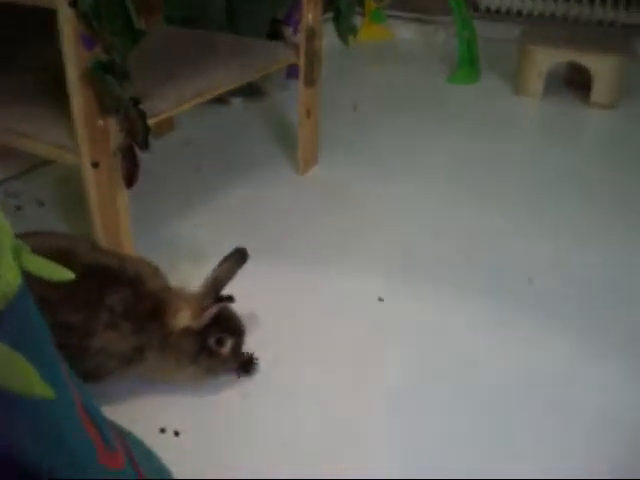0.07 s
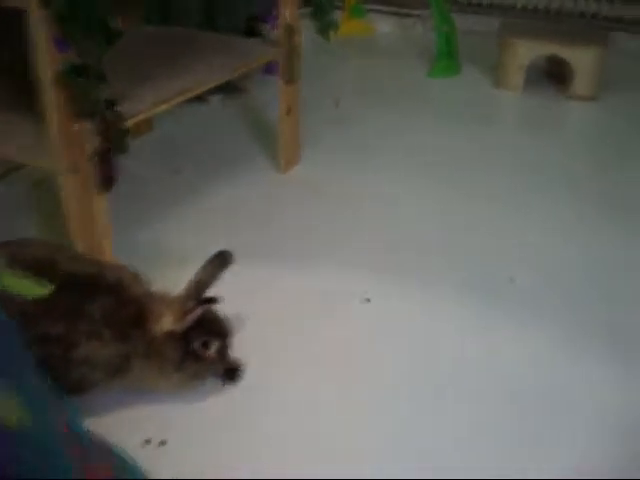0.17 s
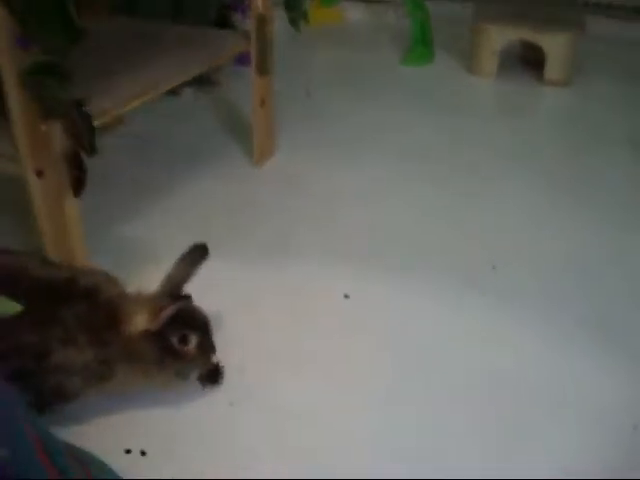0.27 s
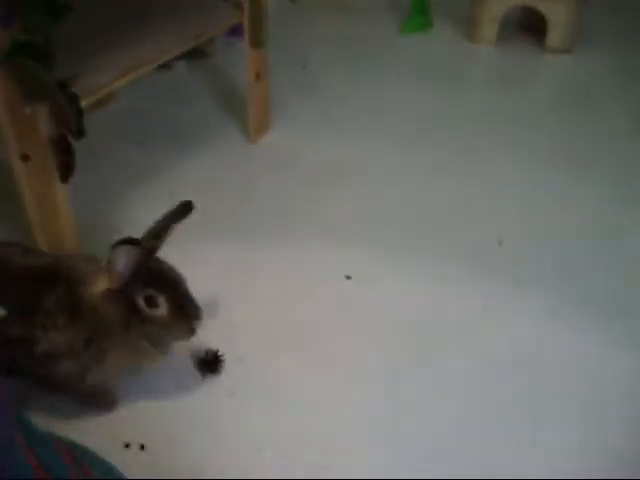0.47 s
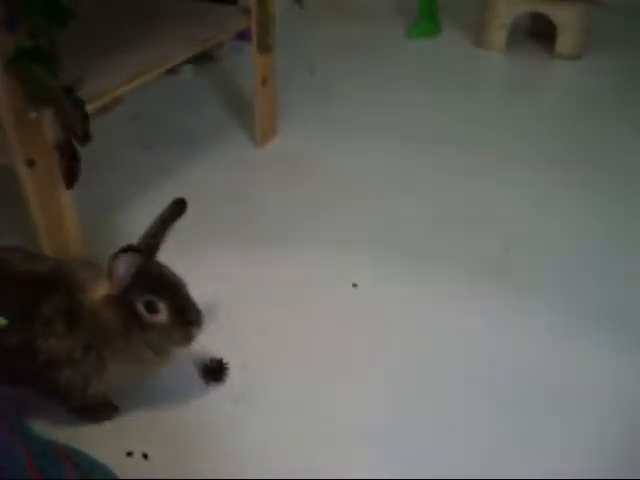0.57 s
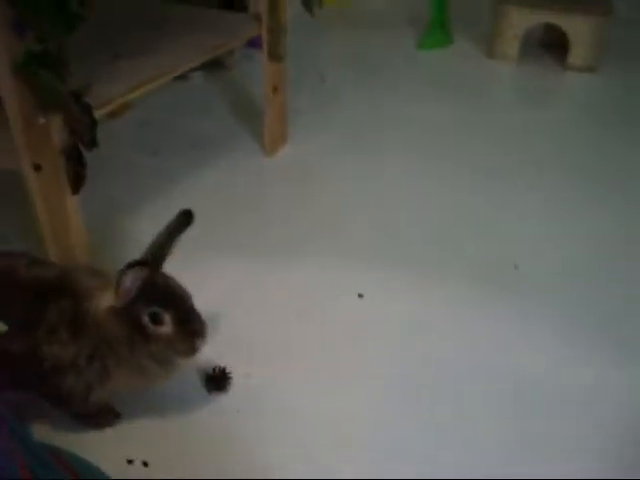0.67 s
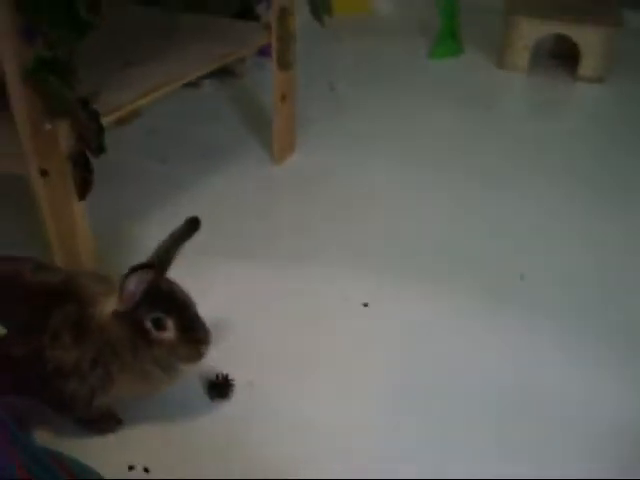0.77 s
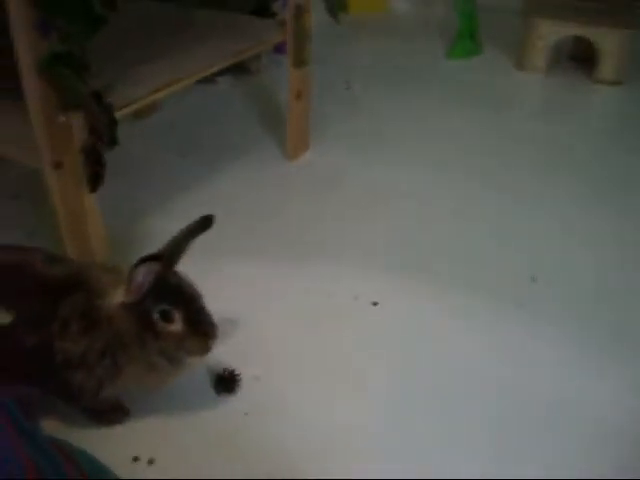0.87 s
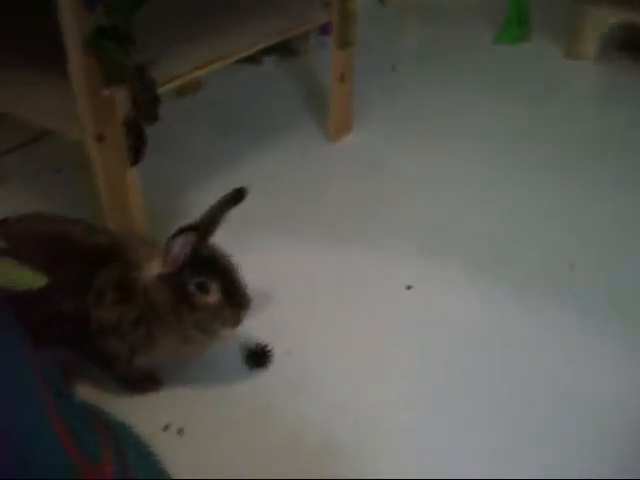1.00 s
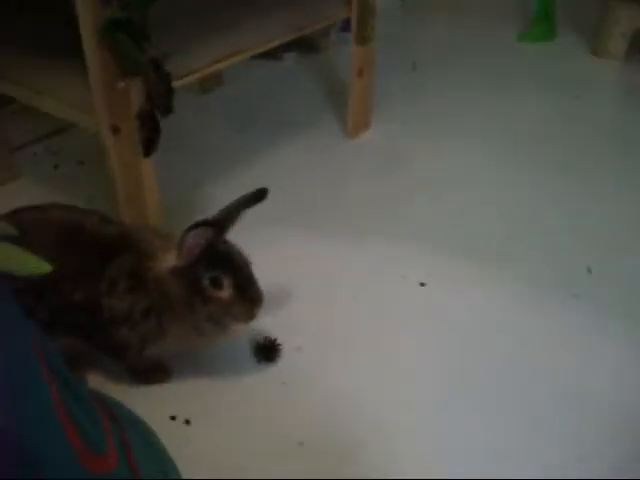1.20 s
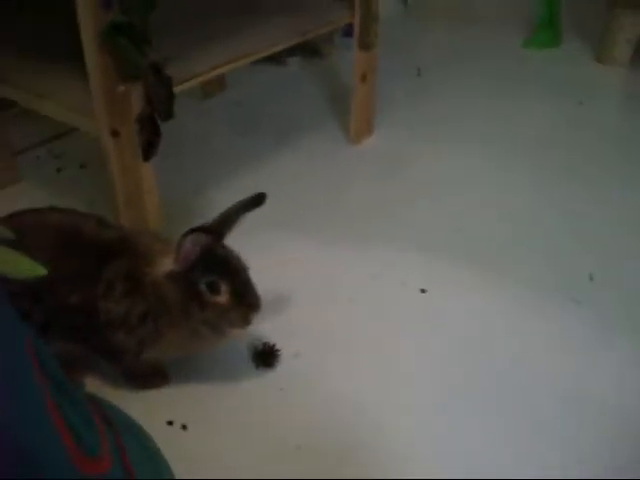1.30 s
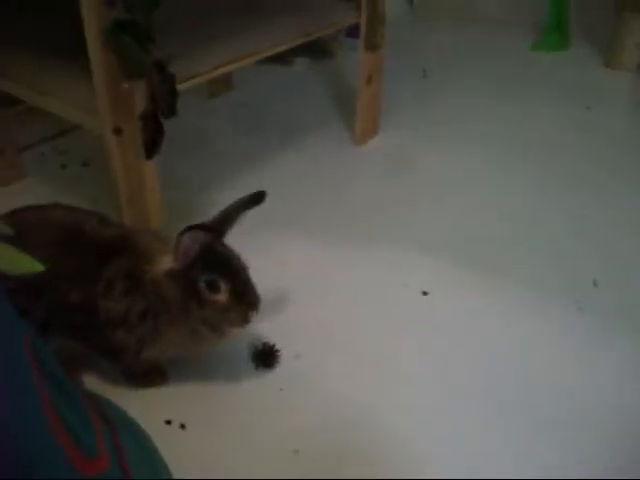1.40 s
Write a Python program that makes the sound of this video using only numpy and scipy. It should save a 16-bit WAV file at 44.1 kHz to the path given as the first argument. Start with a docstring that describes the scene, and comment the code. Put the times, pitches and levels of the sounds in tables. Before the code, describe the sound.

A single low thump sounds as a rabbit stamps on the floor, and the quiet room rings briefly. Faint paw shuffling and a couple of light taps come after, with low hum and grainy microphone hiss throughout.

```python
"""Rabbit stamp in a quiet room

A rabbit stamps a hind foot once in a small room: the boards heave, then floor and room boom and swell.
Light taps and soft scuffles surround the stamp, over a low hum.
A small camera's coarse 8-bit converter adds a gritty hiss and a thin whistle on the thump."""
import sys
import numpy as np
from scipy import signal
from scipy.fft import irfft
from scipy.io import wavfile

SR = 44100
rng = np.random.default_rng(int(sys.argv[2]) if len(sys.argv) > 2 else 0)


def log_audio(samples):
    """Write samples as a 16-bit WAV file to the path given in sys.argv[1]."""
    # one column per channel
    frames = np.atleast_2d(samples).T
    # limit to full scale, then quantise
    limited = np.clip(frames, -1, 1)
    pcm = np.round(limited * 32767).astype(np.int16)
    wavfile.write(sys.argv[1], SR, pcm)


N = 63945

# slap of the sole (frequency [Hz], relative density [dB])
SLAP_SPECTRUM = [(150, -7.5), (430, -4.5), (780, -4), (1030, 1.5), (1280, -12.5), (2400, -11), (4500, -22)]
# short clack of the boards under the foot (frequency [Hz], level [dB], t60 [s])
CLACK_MODES = [(421.3, -17.5, .04), (643, -25.5, .035), (1036, -29, .04)]
# ring of floor and room (frequency [Hz], relative level [dB], t60 [s])
FLOOR_ROOM_MODES = [(50.97, -22.5, 1.0), (78, -31, 1.0), (118, -23.5, .5), (135.6, -20, .66),
                    (155.1, -26.5, .7), (180.5, -29, 0.76), (189.2, -24, 0.82), (231.6, -27, .63),
                    (266.1, -33.5, .9), (287.9, -28.5, .55), (337.3, -27, .65), (360.5, -37.5, .65),
                    (420.8, -43.5, .6), (612.3, -44.5, 0.54)]
# low, diffuse room boom (frequency [Hz], relative density [dB])
BOOM_SPECTRUM = [(25, -8), (45, -4), (95, -8), (140, 1), (230, -3), (380, -4), (500, -15), (750, -25),
                 (1250, -37.5)]
# the room's echo of the clack (frequency [Hz], relative density [dB])
ECHO_SPECTRUM = [(350, -8), (450, 1), (620, -3), (760, -6.5), (1000, -4), (1200, -18), (3000, -31.5)]
# light taps, and at 0.35 s a dull low knock just after the stamp (time [s], body level [dB], tick level [dB],
# t60 [s])
TAP_AND_KNOCK_CUES = [(.083, -55.5, -40, 0.048), (0.35, -28, -68, 0.17), (1.014, -45, -46.5, 0.057),
                      (1.329, -34, -55, .1)]
# dull body of a tap or the knock (frequency [Hz], relative density [dB])
BODY_SPECTRUM = [(50, -19.5), (140, 1.5), (200, -2.5), (330, -13), (700, -23.5), (1500, -41.5)]
# bright edge of a tap (frequency [Hz], relative density [dB])
TICK_SPECTRUM = [(300, -11), (650, -4), (920, -6.5), (1300, -3), (2000, -5.5), (4000, -19)]
# brief ring of a tap (frequency [Hz], relative level [dB], t60 [s])
TICK_MODES = [(878, 0.5, 0.078), (1033, -1, 0.057), (1363, -8, .04)]
# paw scuffles (start [s], length [s], rumble level [dB], rub level [dB], scratch level [dB])
SCUFFLE_CUES = [(.185, .04, -61.5, -53.5, -50.5), (0.361, .03, -53.5, -57.5, -49.5),
                (0.552, 0.048, -45, -59.5, -67), (0.606, .16, -44.5, -48, -56.5),
                (1.248, .21, -51.5, -62.5, -62)]
# low end of a scuffle (frequency [Hz], relative density [dB])
RUMBLE_SPECTRUM = [(40, -10.5), (90, -8.5), (130, 3), (230, -5), (320, 2.5), (450, -13), (700, -26)]
# midrange of a scuffle (frequency [Hz], relative density [dB])
RUB_SPECTRUM = [(350, -10.5), (600, -7.5), (830, 1), (1020, -5.5), (1300, -14.5), (2500, -25)]
# top end of a scuffle (frequency [Hz], relative density [dB])
SCRATCH_SPECTRUM = [(900, -15), (1900, 0.5), (2900, -2), (4500, -10)]
# fader curve that the hum wavers around (time [s], level [dB])
HUM_FADER = [(0, -57.5), (0.139, -46), (0.648, -45.5), (.92, -49.5), (1.221, -56.5), (1.45, -52.5)]
# dull bed of room noise (frequency [Hz], relative density [dB])
ROOM_SPECTRUM = [(15, 1), (35, -7), (90, -5), (135, 4), (250, -9), (360, -6), (500, -11), (900, -14),
                 (1500, -22), (5000, -35)]
# smooth hiss under the converter's grit (frequency [Hz], relative density [dB])
SMOOTH_HISS_SPECTRUM = [(300, 2), (2000, 0.5), (5000, -8), (9000, -9.5), (11000, -18.5), (12500, -12)]

FAST_RISE_S = .0018


def stamp(at=.227):
    """The sole slaps, the boards clack and heave once, their modes ring on and the room echoes."""
    heave_hz, heave_peak_s, heave_width_s = 149.2, .0064, .0046
    room_rise_s = .0089
    age = since(at)
    from_peak = age - heave_peak_s
    heave_envelope = np.exp(-(from_peak / heave_width_s) ** 2) * np.minimum(age / FAST_RISE_S, 1)
    heave = -undb(-4.5) * np.cos(2 * np.pi * heave_hz * from_peak) * heave_envelope
    slap = undb(-34) * noise(SLAP_SPECTRUM) * hit_envelope(at, FAST_RISE_S, t60=.055)
    clack = struck_modes(CLACK_MODES, at, FAST_RISE_S)
    ring = undb(.5) * struck_modes(FLOOR_ROOM_MODES, at, rise=.012)
    boom = undb(-26.5) * noise(BOOM_SPECTRUM) * hit_envelope(at, room_rise_s, t60=.74)
    echo = undb(-33.5) * noise(ECHO_SPECTRUM) * hit_envelope(at, room_rise_s, t60=.5)
    return heave + slap + clack + ring + boom + echo


def taps_and_knock():
    """Light taps layer a dull body with a ringing tick; the dull knock is nearly all body."""
    out = np.zeros(N)
    for at, body_db, tick_db, t60 in TAP_AND_KNOCK_CUES:
        envelope = hit_envelope(at, FAST_RISE_S, t60)
        tick = noise(TICK_SPECTRUM) * envelope + struck_modes(TICK_MODES, at, FAST_RISE_S)
        body = noise(BODY_SPECTRUM) * envelope
        out += undb(body_db) * body + undb(tick_db) * tick
    return out


def scuffles(attack_s=.025, release_s=.025):
    """Paws shift and slide: a low rumble, a midrange rub and a fine scratch on top."""
    out = np.zeros(N)
    for at, length, rumble_db, rub_db, scratch_db in SCUFFLE_CUES:
        envelope = np.minimum(since(at) / attack_s, 1) * np.exp(-since(at + length) / release_s)
        rumble = undb(rumble_db) * noise(RUMBLE_SPECTRUM)
        rub = undb(rub_db) * noise(RUB_SPECTRUM)
        scratch = undb(scratch_db) * noise(SCRATCH_SPECTRUM)
        out += envelope * (rumble + rub + scratch)
    return out


def hum(pitch_hz=60.15, waver_db=2.5, waver_hz=7):
    """A low sine hum whose level drifts and wavers."""
    waver = noise([(1, 0), (waver_hz, 0)])
    level_db = np.interp(since(0), *np.array(HUM_FADER).T) + waver_db * waver
    return np.sqrt(2) * np.sin(2 * np.pi * pitch_hz * since(0)) * undb(level_db)


def room_tone(room_db=-52, hiss_db=-61.5):
    """A bed of dull room noise and the even hiss of the microphone."""
    return undb(room_db) * noise(ROOM_SPECTRUM) + undb(hiss_db) * rng.standard_normal(N)


def struck_modes(modes, start, rise):
    """Decaying modes set off together; neighbours swing in opposite directions."""
    age = since(start)
    return sum((-1) ** k * undb(db) * np.sin(2 * np.pi * hz * age) * hit_envelope(start, rise, t60)
               for k, (hz, db, t60) in enumerate(modes))


def hit_envelope(start, rise, t60):
    """Fast attack, then a tail that falls 60 dB in t60 seconds."""
    age = since(start)
    return (1 - np.exp(-age / rise)) * np.exp(-np.log(1000) * age / t60)


def noise(spectrum):
    """Noise of rms 1, shaped by an EQ curve and rolled off beyond its ends."""
    hz, db = np.array(spectrum, float).T
    bins_hz = np.maximum(np.arange(N // 2 + 1) * SR / N, 1)
    eq = undb(np.interp(np.log(bins_hz), np.log(hz), db))
    roll_off = np.minimum(bins_hz / hz[0], 1) * np.minimum(hz[-1] / bins_hz, 1) ** 2
    random_phases = np.exp(2j * np.pi * rng.random(len(bins_hz)))
    shaped = irfft(eq * roll_off * random_phases, N)
    return shaped / shaped.std()


def since(start):
    """Seconds since a moment, zero before it."""
    return np.maximum(np.arange(N) / SR - start, 0)


def undb(db):
    """Decibels to gain."""
    return 10 ** (np.asarray(db) / 20)


def scene():
    """The mono mix at the microphone."""
    return (stamp() + taps_and_knock() + scuffles() + hum() + room_tone())[None]


def record(dry):
    """A slightly biased 8-bit converter: its steps hiss, its hold mirrors the lows around 11 kHz."""
    hold_samples, step, bias = 4, 1 / 128, -.0183
    smooth_hiss_db, cutoff_hz = -62, 12700
    crushed = np.round((dry[:, ::hold_samples] + bias) / step) * step
    held = np.repeat(crushed, hold_samples, axis=1)[:, :N]
    smooth_hiss = undb(smooth_hiss_db) * noise(SMOOTH_HISS_SPECTRUM)
    low_pass = signal.ellip(10, .1, 80, cutoff_hz, fs=SR, output="sos")
    return signal.sosfilt(low_pass, held + smooth_hiss - bias) + bias


dry = scene()
out = record(dry)
log_audio(out)
```